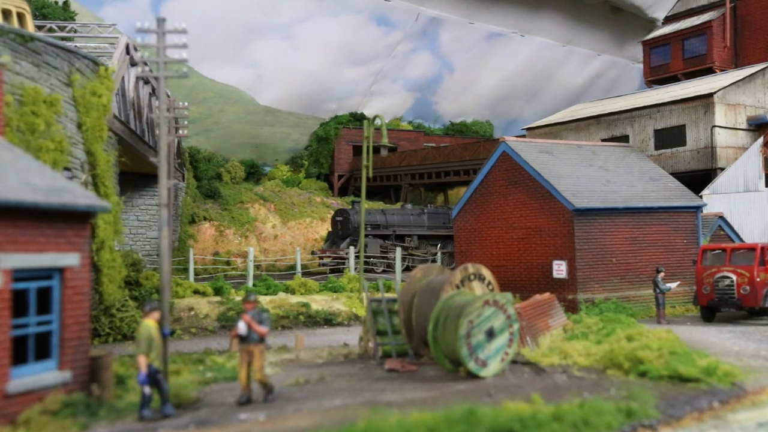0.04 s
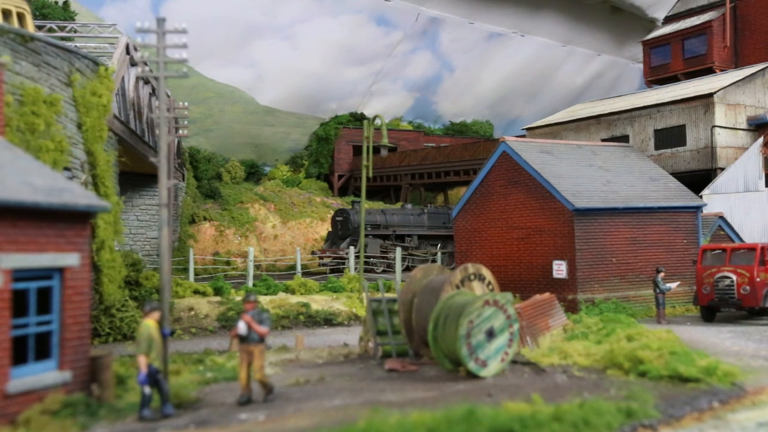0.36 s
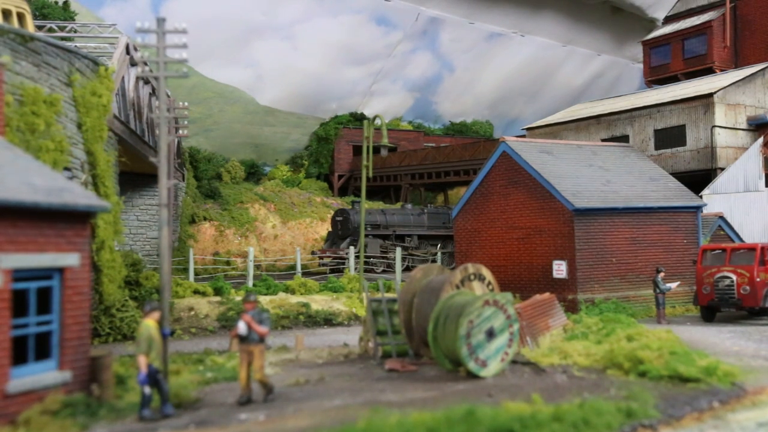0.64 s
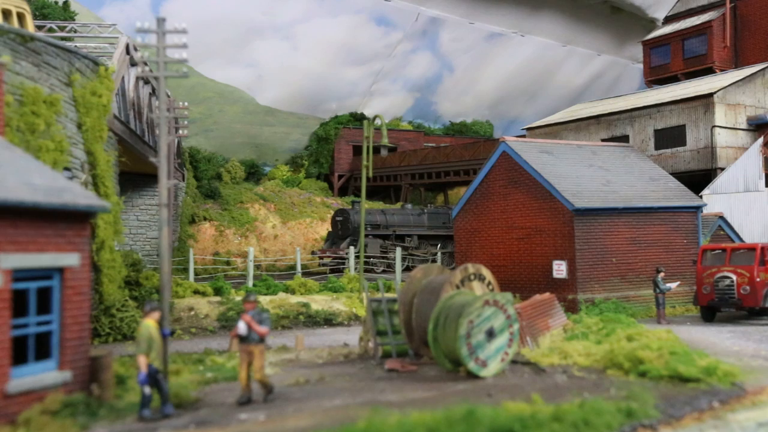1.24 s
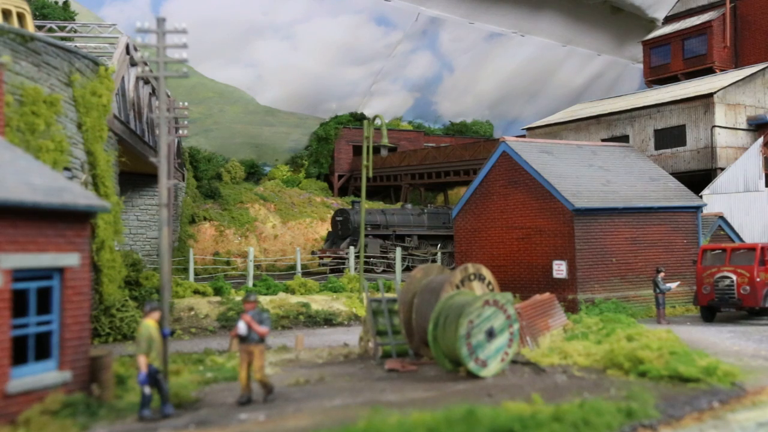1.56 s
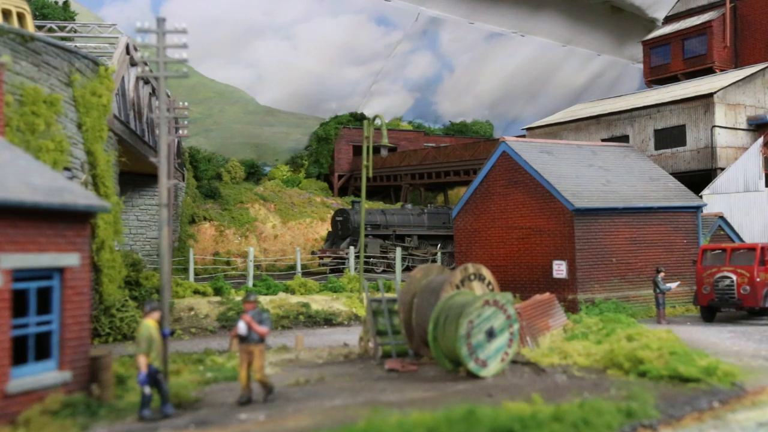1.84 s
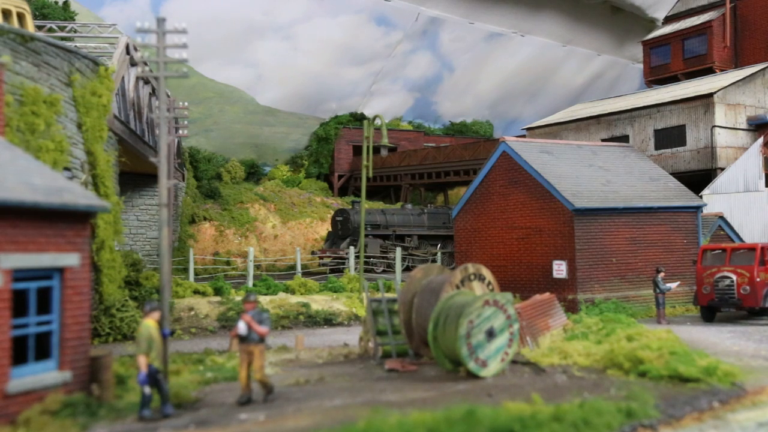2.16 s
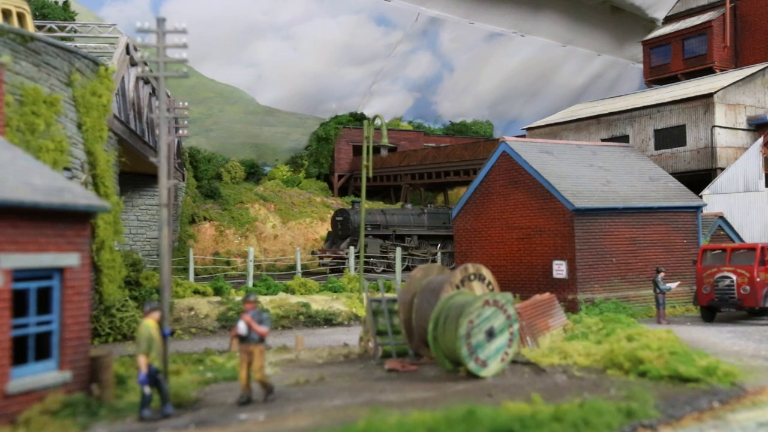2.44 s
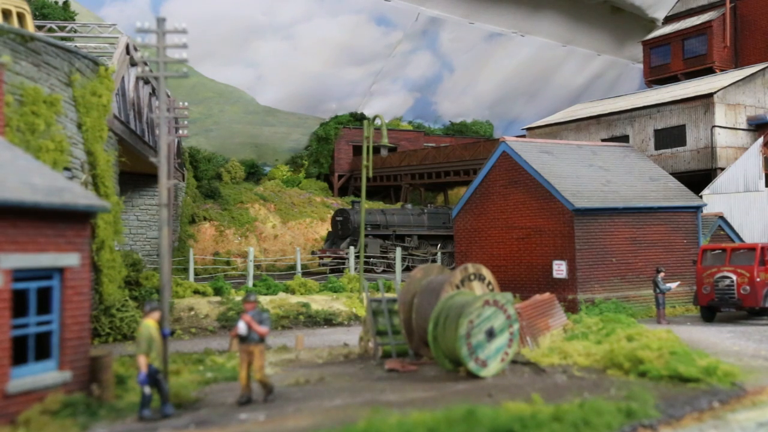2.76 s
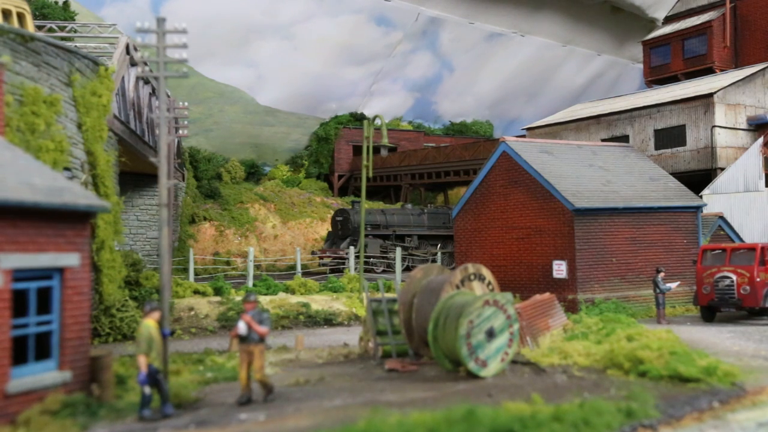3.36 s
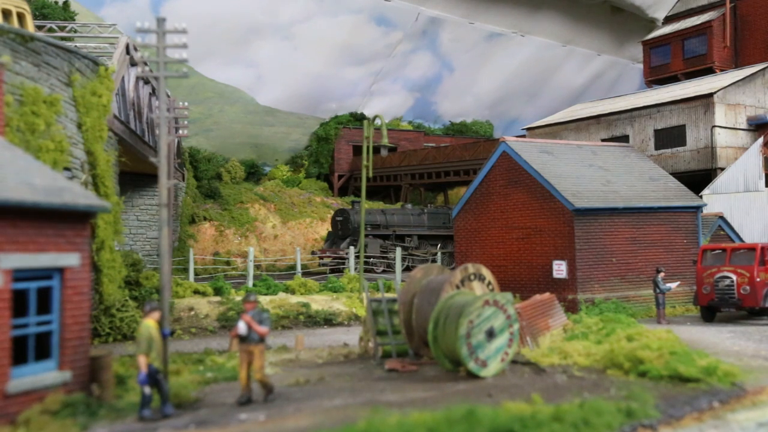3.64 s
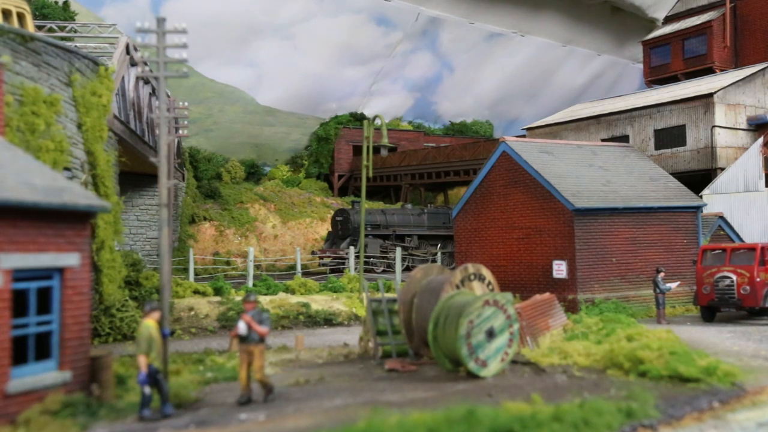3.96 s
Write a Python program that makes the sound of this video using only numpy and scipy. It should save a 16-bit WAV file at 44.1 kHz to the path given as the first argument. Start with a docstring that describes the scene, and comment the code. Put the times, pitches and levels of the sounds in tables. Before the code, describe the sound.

A model locomotive rolls slowly with scratchy wheels, a little way off, over a low hum and room noise. A dull bump and faint thin scrape come at about 0.2 seconds. From 0.5 to 3 seconds it rattles in short fits, with faint low rubs and another bump near 1.6. After 3 seconds its gears rise into a louder whirr that holds until 4, the baseboard drumming softly.

```python
"""A model locomotive on an indoor layout, a little way from one microphone, over a low hum and room noise.
It creeps along on rolling wheels, with a dull bump of the baseboard and a thin scrape at the start.
From half a second on its loose mechanism rattles in short fits, among low groans and a second bump.
After three seconds the gear train takes up speed and whirrs to the end, and the board drums softly.
Wheels, rattles and gear teeth all sound through the resonances of the locomotive's body."""
import sys
import numpy as np
from scipy.fft import rfft, irfft, next_fast_len
from scipy.io import wavfile
from scipy.ndimage import map_coordinates

SR = 44100
rng = np.random.default_rng(int(sys.argv[2]) if len(sys.argv) > 2 else 0)


def put_to_file(sound):
    """Save the sound as 16-bit audio at rate SR, in the file named by the first command-line argument."""
    columns = np.atleast_2d(sound).T  # one column per channel
    safe = np.clip(columns, -1, 1)
    whole_steps = np.round(safe * 32767)
    wavfile.write(sys.argv[1], SR, whole_steps.astype(np.int16))


N = 176400


def amp(db):
    """Gain of a level in dB."""
    return 10 ** (np.asarray(db) / 20)


def unit(x):
    """Scale to rms 1."""
    return x / np.sqrt(np.mean(x ** 2) + 1e-20)


def colour(points, hz):
    """Gain at hz of a curve of (freq_hz, gain_db) points on a log frequency axis."""
    freq_hz, gain_db = np.transpose(points)
    return amp(np.interp(np.log(hz + 1), np.log(freq_hz + 1), gain_db))


def level(points):
    """Gain per sample of a curve of (time_s, level_db) points."""
    return amp(np.interp(np.arange(N) / SR, *np.transpose(points)))


def wobble(knots_per_s):
    """A smooth random curve."""
    knots = rng.standard_normal(int(N * knots_per_s / SR) + 4)
    return map_coordinates(knots, [np.arange(N) * knots_per_s / SR])


def burst(start_s, rise_s, hold_s, level_db, fall_db_per_s):
    """An envelope that rises, holds and dies away."""
    t = np.arange(N) / SR - start_s
    return np.clip(t / rise_s, 0, 1) * amp(level_db - fall_db_per_s * np.maximum(t - rise_s - hold_s, 0))


def peak(hz, centre_hz, width_hz):
    """Gain of a steep-sided resonance."""
    return 1 / (1 + (2 * (hz - centre_hz) / width_hz) ** 2)


def resonances(modes, hz):
    """Gain of several resonances whose powers add."""
    return np.sqrt(sum((amp(db) * peak(hz, centre, width)) ** 2 for centre, width, db in modes))


def filtered(x, gain):
    """x through the minimum-phase filter with this gain over frequency."""
    size = 2 * next_fast_len(N)
    cepstrum = irfft(np.log(np.maximum(gain(np.fft.rfftfreq(size, 1 / SR)), 1e-6)))
    cepstrum[1:size // 2] *= 2
    cepstrum[size // 2 + 1:] = 0
    return irfft(rfft(x, size) * np.exp(rfft(cepstrum)), size)[:N]


def noise(gain):
    """Coloured noise of rms 1."""
    size = next_fast_len(N)
    spectrum = rfft(rng.standard_normal(size)) * gain(np.fft.rfftfreq(size, 1 / SR))
    return unit(irfft(spectrum, size)[:N])


def contacts(hits_per_s, scatter_db, rub_db):
    """Tiny irregular impacts over the noise of rubbing, rms 1."""
    hits = (rng.random(N) < hits_per_s / SR) * np.sign(rng.standard_normal(N))
    strength = amp(scatter_db * rng.standard_normal(N))
    rubbing = amp(rub_db) * rng.standard_normal(N)
    return unit(unit(hits * strength) + rubbing)


def through_body(force, tilt):
    """A force, coloured by tilt, rings the locomotive's body and keeps about the same level."""
    # resonances of the body: pitch_hz, width_hz, gain_db
    modes = [(748.4, 154, -33.5), (1331, 71, -21.5), (1416, 24, -20.5), (1566, 53, -18.5),
             (1733, 358, -21.5), (1982, 191, -18), (2153, 77, -13), (2317, 96, -12.5), (2527, 108, -9),
             (2692, 37, -8), (2761, 76, -6.5), (2872, 92, -7.5), (2966, 110, -20.5), (3117, 94, -17),
             (3280, 90, -17), (3495, 160, -14), (3593, 130, -19.5), (3756.4, 120, -11.5),
             (3945, 59.8, -13.5), (4102, 73, -13.5), (4245, 68, -15.5), (4440, 239, -25),
             (4880, 120, -23.5), (5067, 225, -28), (5340, 210, -34), (6396, 660, -37), (6963, 120, -36.5),
             (7520, 310, -34.5), (8064, 195, -28.5), (8470, 1170, -39), (10400, 1400, -48),
             (11400, 390, -45.5)]
    # deep, narrow gaps between them: centre_hz, width_hz
    gaps = [(1480, 16), (1615, 15), (2405, 20.3), (3355, 25), (3865, 27), (5660, 140), (6720, 120),
            (7190, 84), (7830, 220), (9220, 110)]

    def gain(hz):
        notches = np.prod([1 - .93 * peak(hz, centre, width) for centre, width in gaps], axis=0)
        return resonances(modes, hz) * notches * tilt(hz)

    rms_gain = np.sqrt(np.mean(gain(np.linspace(0, SR / 2, SR // 8)) ** 2))
    return filtered(force, lambda hz: gain(hz) / rms_gain)


def gear_whirr():
    """Gear teeth strike harder and softer as the shafts turn, and ring the body and the gears."""
    # swell of the gear train: time_s, level_db
    swell = [(3.1, -73), (3.2, -52.5), (3.3, -36), (3.38, -28), (3.45, -23), (3.52, -20), (3.59, -17.5),
             (3.7, -17.5), (3.87, -18), (4, -17.5)]
    # colour of the tooth contacts: freq_hz, gain_db
    tilt = [(300, -21.5), (750, -3), (1400, 1), (2700, -1), (5000, 0.5), (8000, 2), (11500, 0.5),
            (13000, -10)]
    # resonances of the gears: pitch_hz, width_hz, boost_db
    gear_modes = [(2698, 32, 12.5), (2840, 53, 5), (2380, 63, 0)]
    # beats of the turning shafts: rate_hz, depth
    shafts = [(23.3, 0.043), (32.6, 0.06), (56.5, 0.067), (117.5, 0.056), (163.5, 0.06), (254, 0.079)]

    def gear_gain(hz):
        boost = sum((amp(db) - 1) * peak(hz, centre, width) for centre, width, db in gear_modes)
        return colour(tilt, hz) * (1 + boost)

    shaft_time = np.cumsum(1 + 0.0168 * wobble(5)) / SR  # the speed wanders slightly
    load = np.exp(sum(depth * np.sin(2 * np.pi * (hz * shaft_time + rng.random())) for hz, depth in shafts))
    teeth = contacts(hits_per_s=1400, scatter_db=2, rub_db=1.5)
    return through_body(unit(load * teeth) * level(swell), gear_gain)


def rattles():
    """Loose parts chatter against the body; in each fit one part rings out briefly."""
    # fits of rattling: start_s, rise_s, hold_s, level_db, fall_db_per_s, ring_hz, ring_over_rattle_db
    fits = [(.548, 0.016, 0.0163, -38.5, 110, 2530, -5.5), (0.616, 0.0099, 0.016, -32, 100, 2560, -1.5),
            (0.647, 0.014, 0.031, -39, 130, 1943, 0), (0.763, 0.032, 0.017, -29, 230, 2274, -2),
            (1.155, 0.014, 0.0089, -43.5, 296, 2750, -14), (1.232, 0.013, 0.026, -42, 118, 1347, -16.5),
            (1.298, 0.012, 0.018, -39, 155, 1530, -3), (1.384, 0.0053, 0.0061, -28.5, 110, 1347, -1.5),
            (1.437, 0.011, 0.0091, -35.5, 202, 1560, -7), (1.637, 0.011, 0.01, -34.5, 137.5, 1536, -5.5),
            (1.753, 0.0123, 0.0107, -41.5, 200, 1430, 0.5), (1.988, 0.018, 0.0255, -26.5, 141, 1600, -12.5),
            (2.274, 0.028, 0.0132, -38, 134, 2743, -7.5), (2.393, 0.017, 0.018, -42.5, 252, 1361, 1.5),
            (2.535, 0.039, 0.022, -41, 146, 1577, -6), (2.924, .015, 0.034, -50, 200, 1530, -7),
            (3.032, 0.034, 0.0246, -44.5, 250, 1380, 3), (3.128, .014, 0.01, -44, 137.5, 1529, 3.5)]
    # colour of the chatter: freq_hz, gain_db
    tilt = [(600, 3), (1300, 2.5), (2000, -4), (2700, -12), (3300, -12), (4200, -20), (6500, -19.5),
            (8200, -30.5), (11500, -13.5)]
    ring_damping_db_per_s = 60
    power, rings = np.zeros(N), np.zeros(N)
    for start, rise, hold, db, fall, ring_hz, ring_db in fits:
        power += burst(start, rise, hold, db, fall) ** 2
        ring = noise(lambda hz: peak(hz, ring_hz, width_hz=51))
        rings += ring * burst(start, rise, hold, db + ring_db, fall + ring_damping_db_per_s)
    force = contacts(hits_per_s=1300, scatter_db=1.5, rub_db=-2) * np.sqrt(power)
    return through_body(force, lambda hz: colour(tilt, hz)) + rings


def rattle_edges():
    """Hard metal contacts brighten the start of three strong rattles."""
    # bursts of hard contact: start_s, rise_s, hold_s, level_db, fall_db_per_s
    edges = [(1.387, .008, .015, -43.5, 160), (1.63, .008, 0.0115, -45, 220),
             (1.984, 0.0105, 0.019, -36.5, 175)]
    # their bright colour: freq_hz, gain_db
    tilt = [(1500, -31), (2700, -9), (3500, 0.5), (5000, -2.5), (8000, -10), (11500, 3)]
    force = contacts(hits_per_s=740, scatter_db=2, rub_db=-3.5) * sum(burst(*edge) for edge in edges)
    return through_body(force, lambda hz: colour(tilt, hz))


def rolling():
    """Wheels and the idling drive scratch along unevenly."""
    # loudness of the rolling: time_s, level_db
    loudness = [(0, -43.5), (.5, -43.5), (1, -43), (1.6, -42.5), (2.2, -43), (2.9, -44), (3.3, -40)]
    # colour of the wheel contacts: freq_hz, gain_db
    tilt = [(700, 0), (1300, -1), (2000, -14.5), (2700, -17.5), (4200, -15), (6500, -19.5), (11500, -22)]
    force = contacts(hits_per_s=700, scatter_db=3, rub_db=2) * level(loudness)
    flicker = amp(1.5 * wobble(25.1))
    return through_body(force * flicker, lambda hz: colour(tilt, hz))


def groans():
    """Wheels and board rub briefly, each time on one low resonance."""
    # rubs: start_s, rise_s, hold_s, level_db, fall_db_per_s, pitch_hz
    rubs = [(1.03, .02, 0.087, -62.5, 100, 445), (1.126, .015, 0.014, -55, 300, 350),
            (1.25, .015, 0.026, -58, 300, 350), (1.289, 0.01, 0.021, -50, 300, 517),
            (1.385, .015, 0.086, -46, 196.5, 785), (1.39, 0.016, .06, -54, 302, 620),
            (1.516, 0.0106, 0.022, -43, 158, 778.5), (2.545, .02, 0.038, -52, 150, 766)]
    return sum(burst(*shape) * noise(lambda hz: peak(hz, pitch, width_hz=39)) for *shape, pitch in rubs)


def board_bumps():
    """Soft thuds in the baseboard."""
    # thuds: start_s, rise_s, hold_s, level_db, fall_db_per_s
    thuds = [(0.188, .015, 0.0214, -49, 110), (1.611, 0.01, .006, -45, 600)]
    # dull colour of the board: freq_hz, gain_db
    tilt = [(60, -20), (130, -6), (250, -5), (400, -5), (540, 3), (750, -6.5), (1500, -35), (4000, -70)]
    return sum(burst(*thud) for thud in thuds) * noise(lambda hz: colour(tilt, hz))


def scrape():
    """Something small and metallic slides for a moment."""
    # thin ringing of the metal: pitch_hz, width_hz, gain_db
    modes = [(6660, 280, -1), (7480, 280, 1), (9580, 170, 0), (11750, 240, 2), (12950, 500, -8),
             (9500, 12000, -11)]
    # the slide: start_s, rise_s, hold_s, level_db, fall_db_per_s
    slide = (.208, .03, .05, -59.5, 115)
    return burst(*slide) * noise(lambda hz: resonances(modes, hz))


def board_rumble():
    """The baseboard drums softly once the train gathers speed."""
    # colour of the drumming: freq_hz, gain_db
    tilt = [(25, -9), (58, 4.5), (80, -9), (115, 2), (170, -6.5), (400, -30), (1500, -60)]
    # its swell: time_s, level_db
    swell = [(2.8, -71), (3.2, -56), (3.6, -57), (4, -66)]
    return level(swell) * noise(lambda hz: colour(tilt, hz))


def room_tone():
    """A wavering low hum, the murky noise of the room and a faint hiss."""
    # loudness of the hum: time_s, level_db
    hum_level = [(0, -52.5), (1.25, -52.5), (1.8, -46.5), (2.3, -50), (2.8, -57.5), (3.1, -52), (3.6, -56),
                 (4, -58.5)]
    # colour of the room noise: freq_hz, gain_db
    air_tilt = [(20, -14), (40, -11), (60, 1.5), (80, 1.5), (105, -0.5), (150, -4), (200, -2.5),
                (400, -4.5), (700, -3), (1100, -4.5), (2500, -19.5), (5500, -45)]
    # loudness of the room noise: time_s, level_db
    air_level = [(0, -55.5), (.8, -54.5), (1.4, -49.5), (2, -49), (2.8, -52), (4, -56)]
    # colour of the hiss: freq_hz, gain_db
    hiss_tilt = [(1000, -19), (6000, 3), (11000, 4), (15500, 2)]
    hum_hz = 60.85 + 0.67 * wobble(5.87)
    hum = np.sqrt(2) * np.sin(2 * np.pi * np.cumsum(hum_hz) / SR)
    flicker = amp(0.63 * wobble(14))
    air = noise(lambda hz: colour(air_tilt, hz)) * level(air_level)
    hiss = amp(-65.5) * noise(lambda hz: colour(hiss_tilt, hz))
    return hum * flicker * level(hum_level) + air + hiss


def scene():
    """The locomotive on its layout, heard in mono from a little way off."""
    creeping = rolling() + rattles() + rattle_edges() + scrape() + groans() + board_bumps()
    running = gear_whirr() + board_rumble()
    return (creeping + running + room_tone())[None]


def record(dry):
    """The recorder keeps nothing above its band limit."""
    top_hz = 15720
    size = next_fast_len(N + SR // 2)
    passband = np.fft.rfftfreq(size, 1 / SR) < top_hz
    return irfft(rfft(dry, size) * passband, size)[:, :N]


dry = scene()
out = record(dry)
put_to_file(out)
```